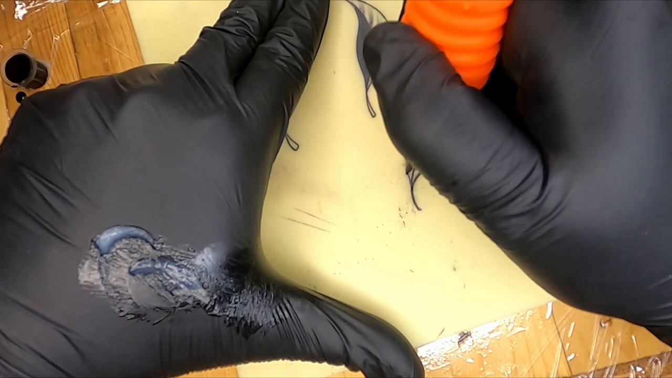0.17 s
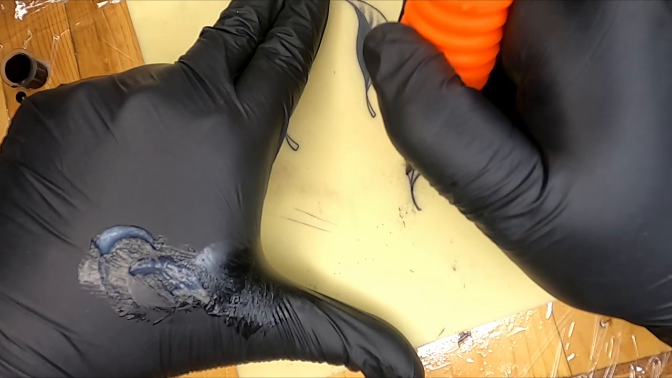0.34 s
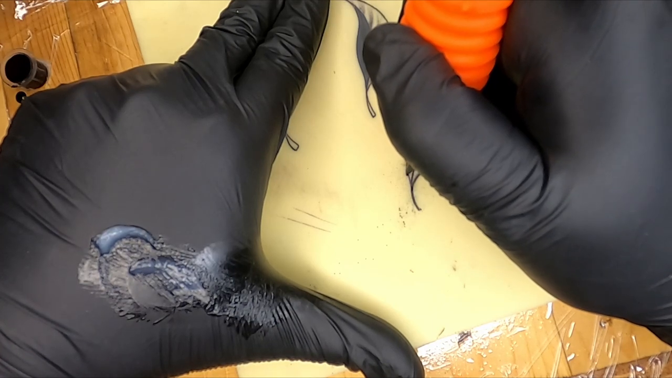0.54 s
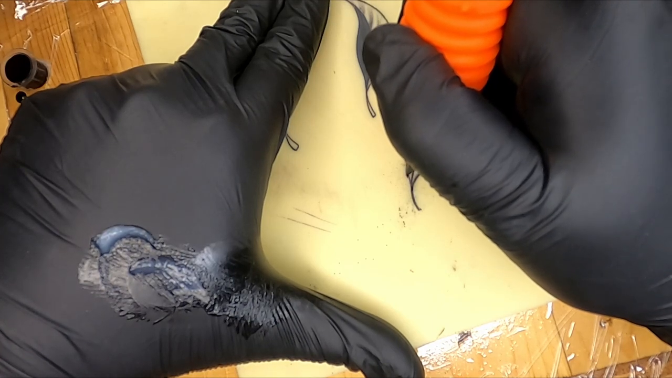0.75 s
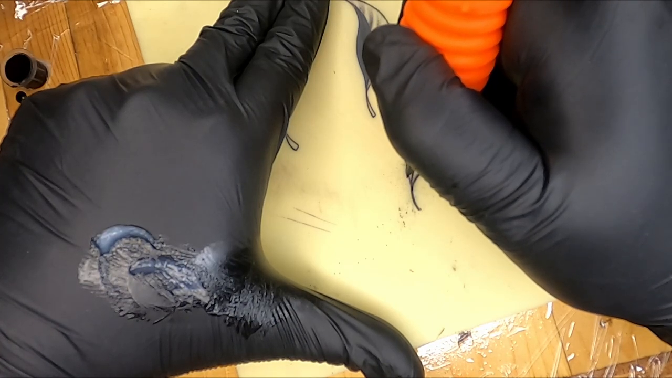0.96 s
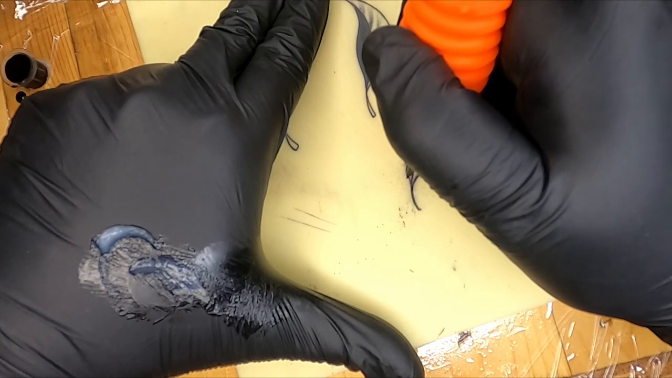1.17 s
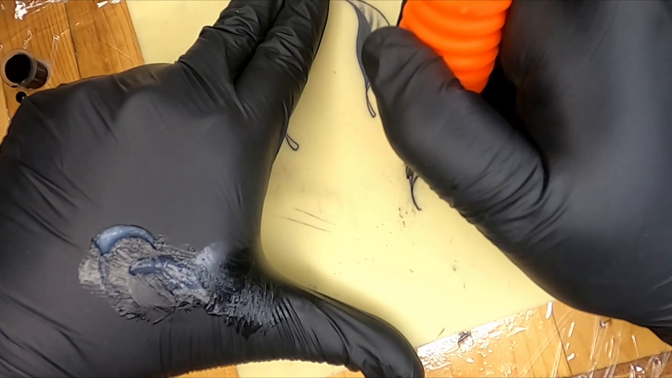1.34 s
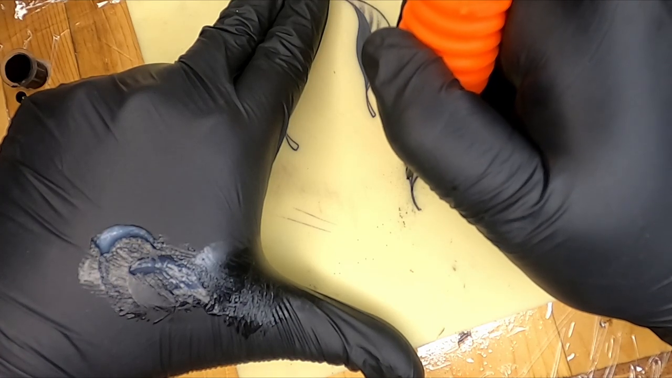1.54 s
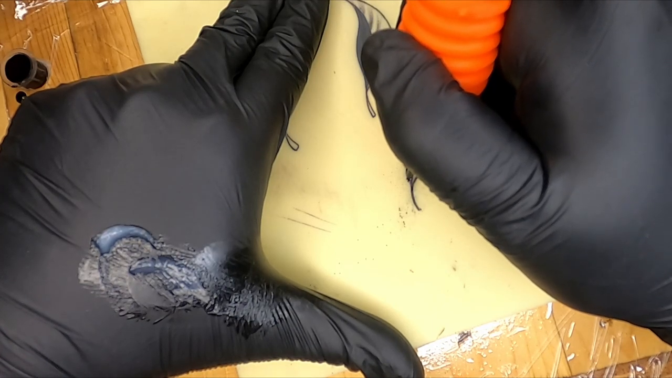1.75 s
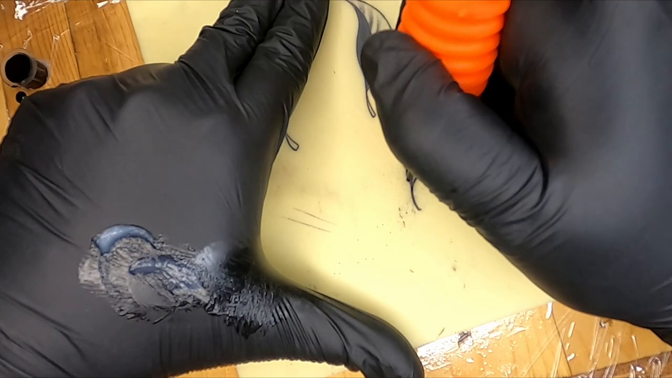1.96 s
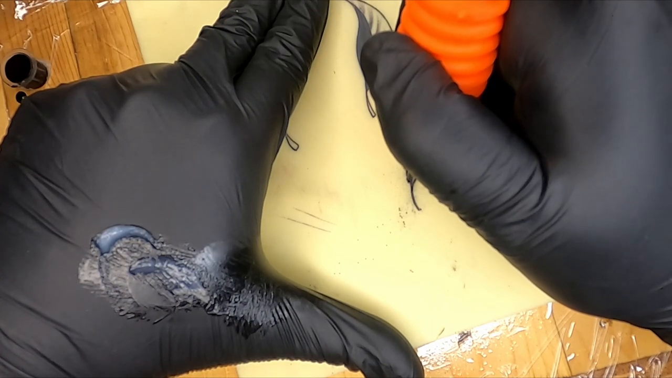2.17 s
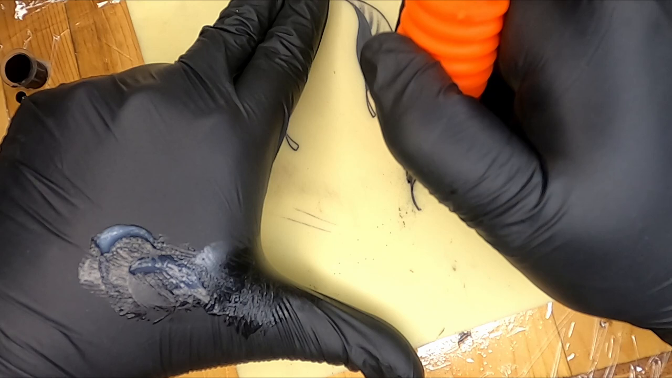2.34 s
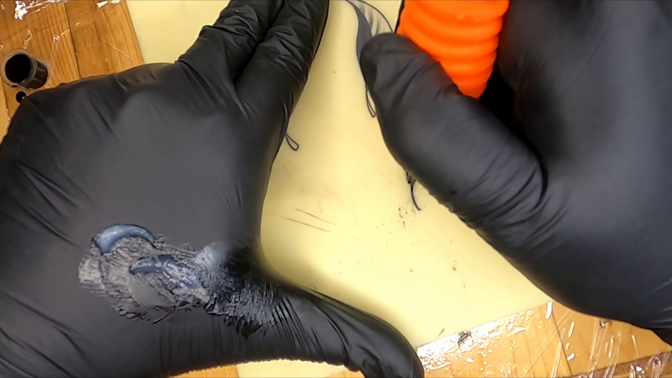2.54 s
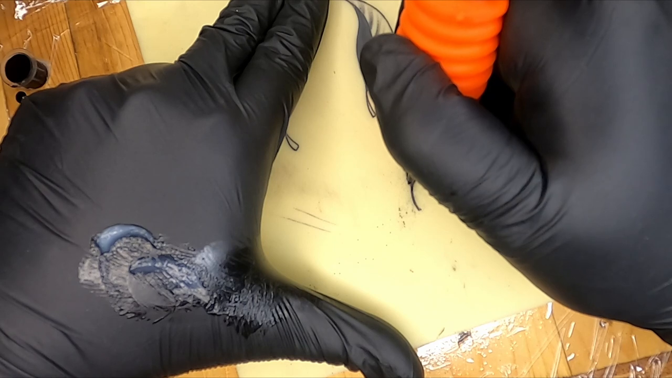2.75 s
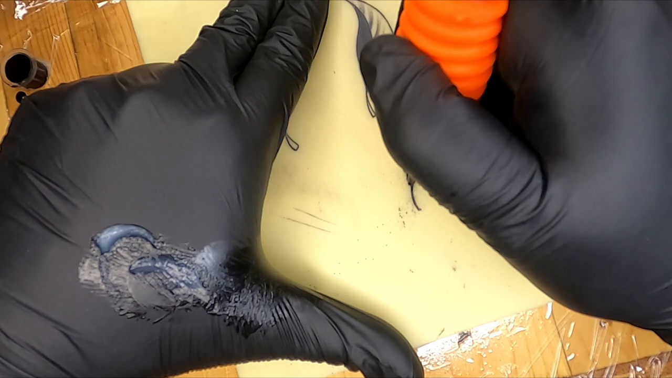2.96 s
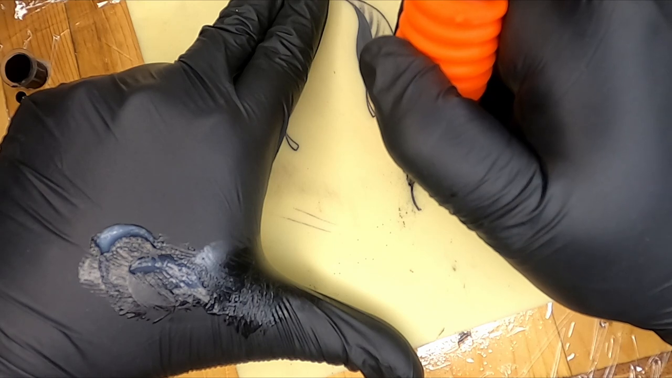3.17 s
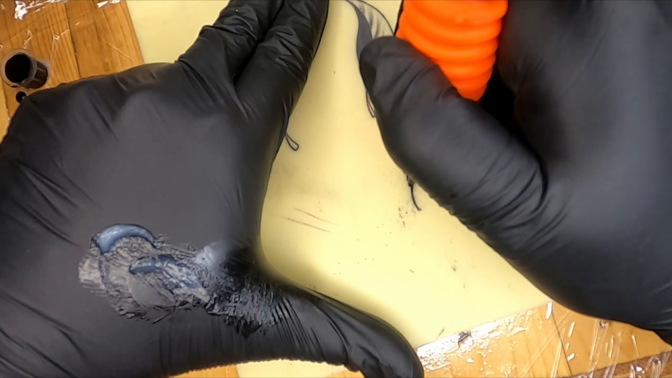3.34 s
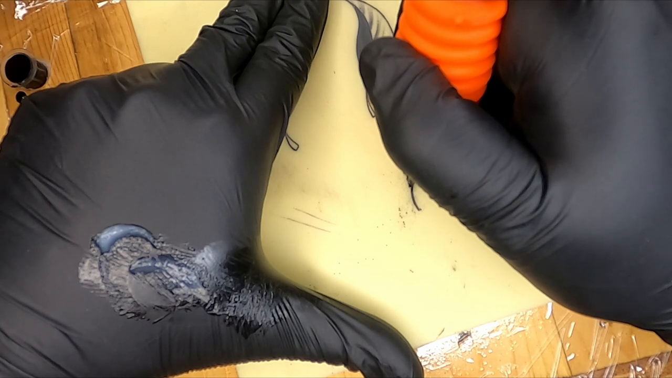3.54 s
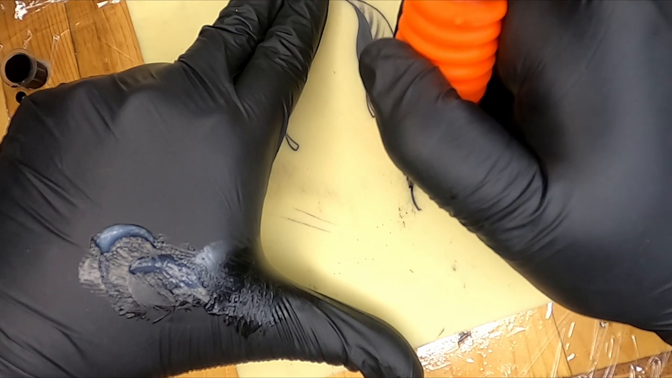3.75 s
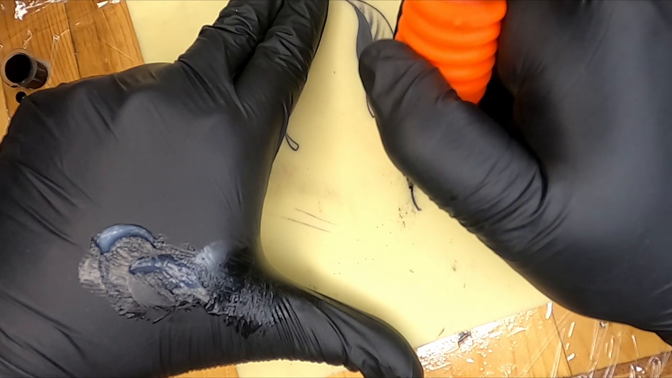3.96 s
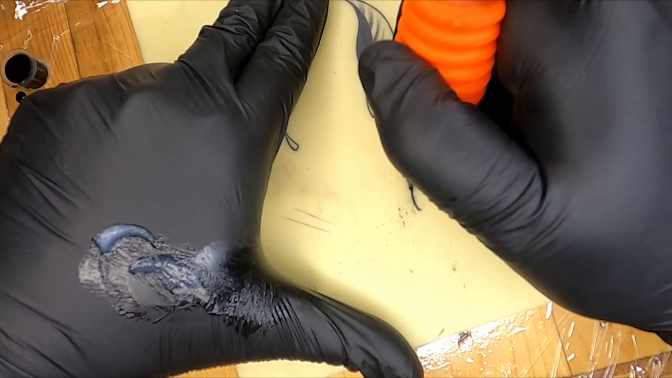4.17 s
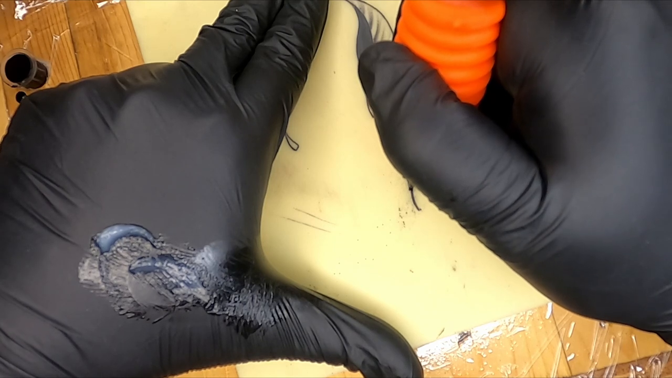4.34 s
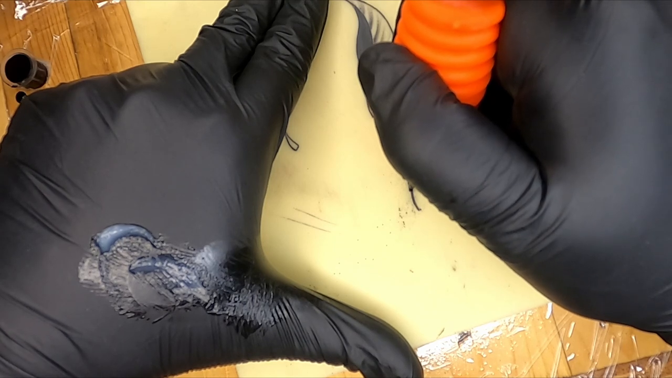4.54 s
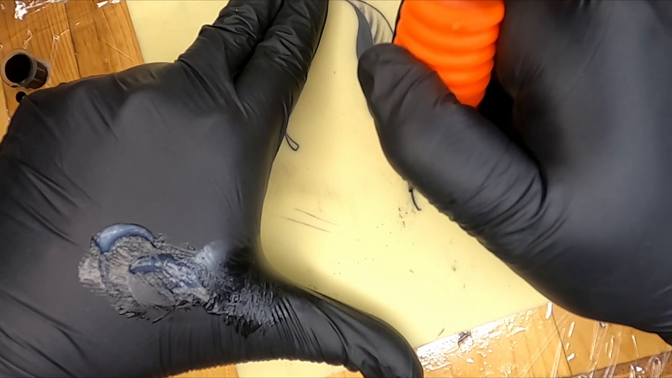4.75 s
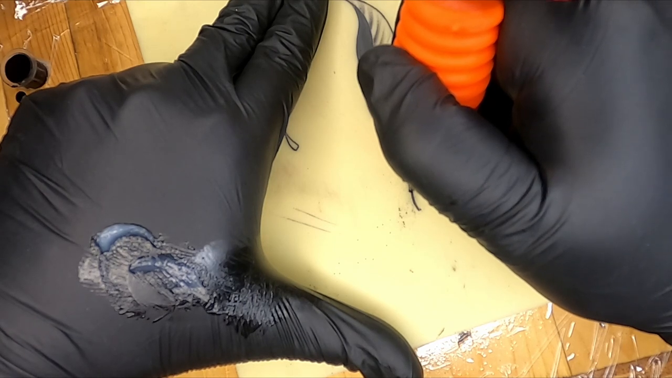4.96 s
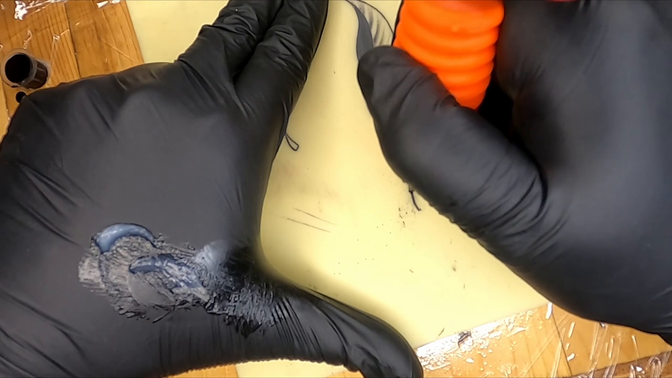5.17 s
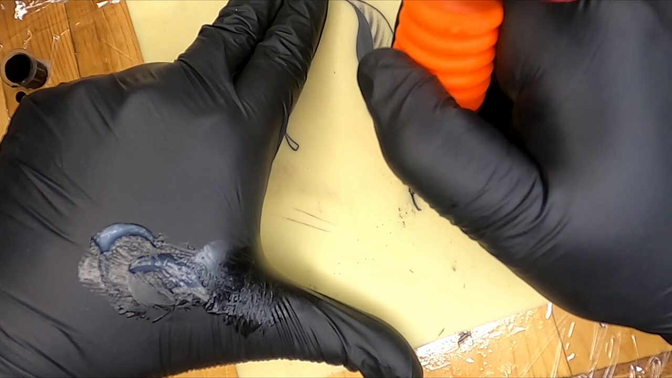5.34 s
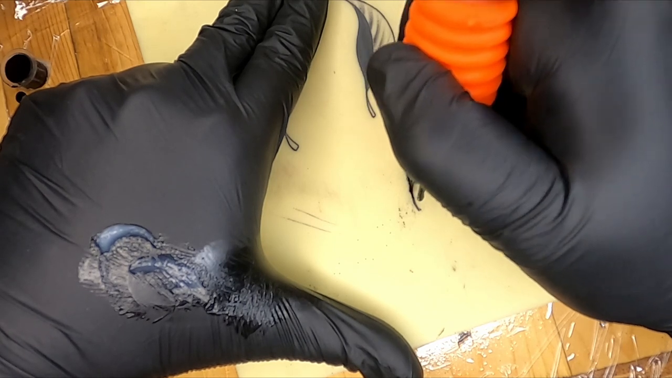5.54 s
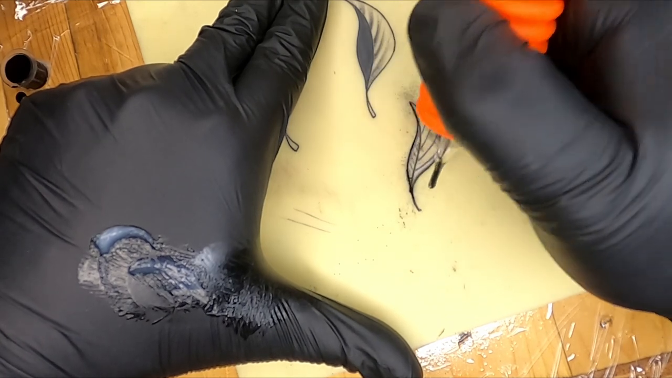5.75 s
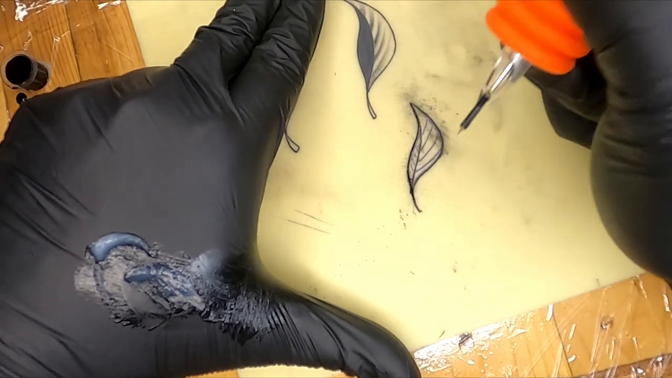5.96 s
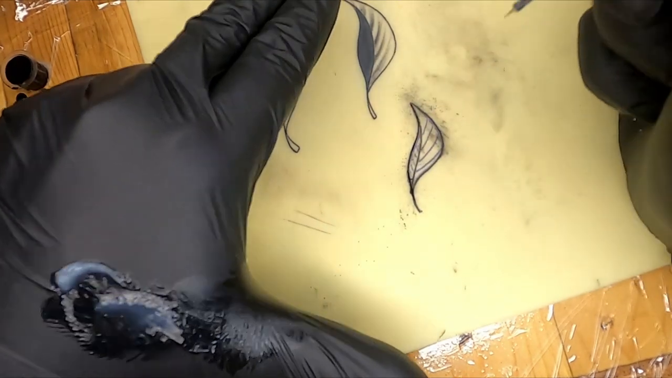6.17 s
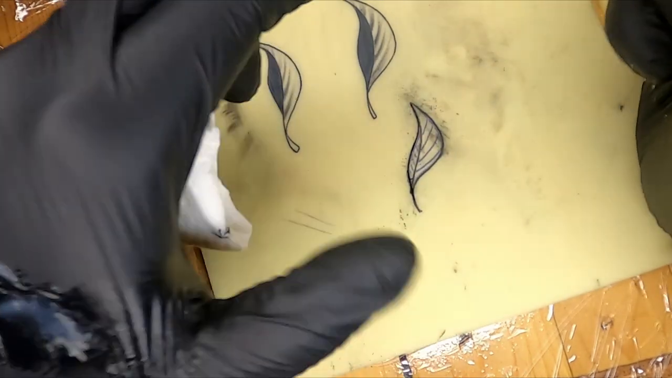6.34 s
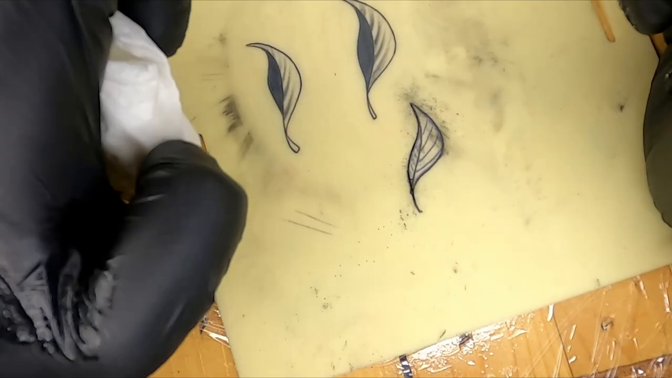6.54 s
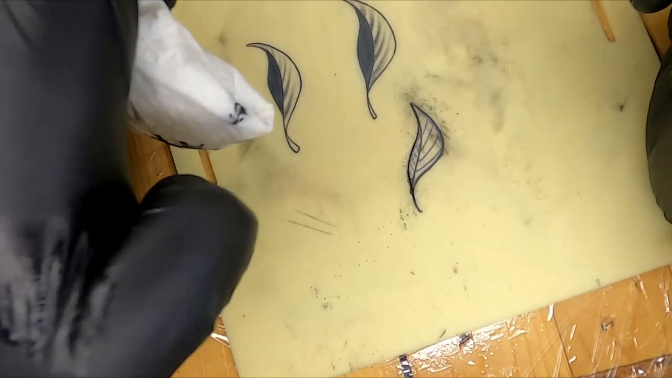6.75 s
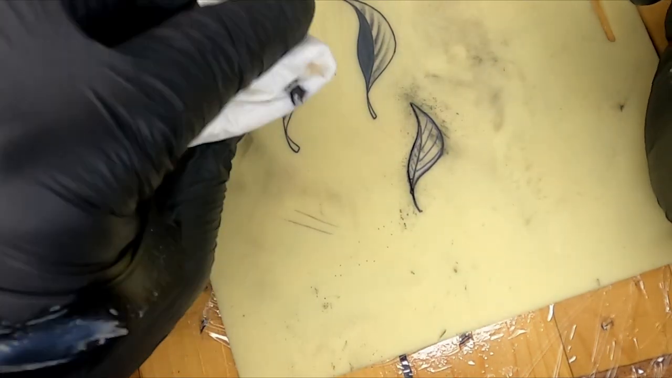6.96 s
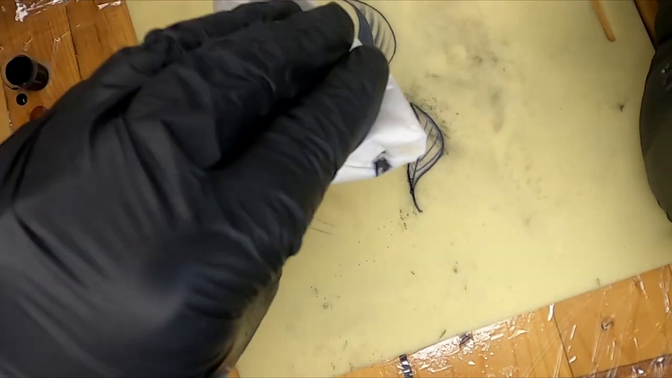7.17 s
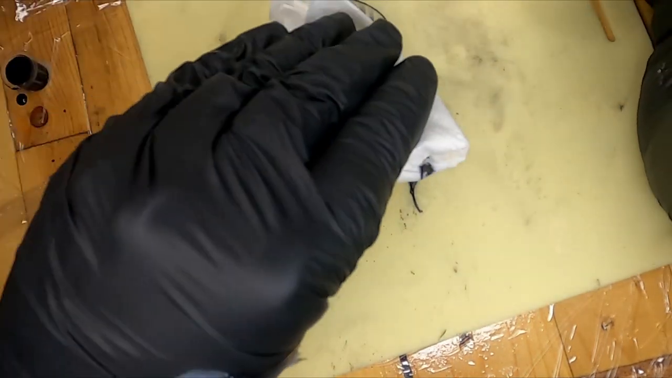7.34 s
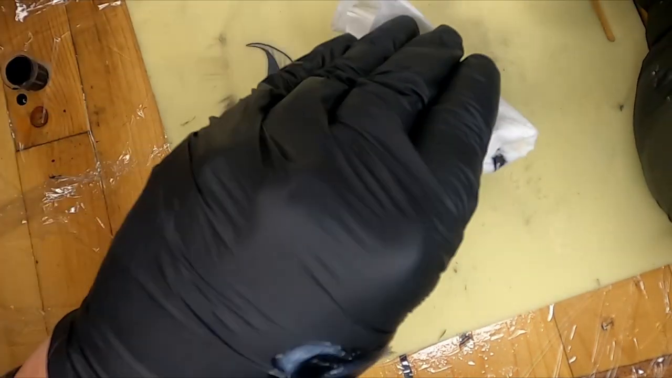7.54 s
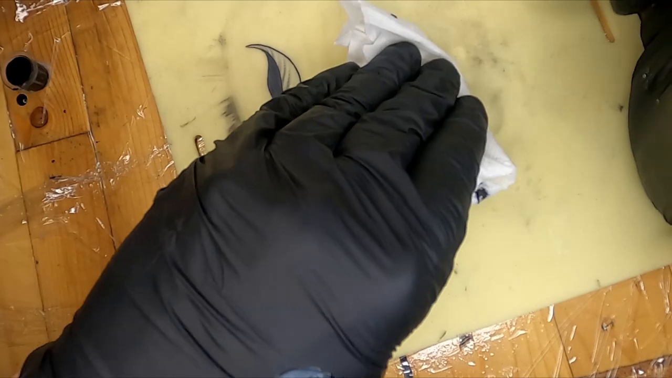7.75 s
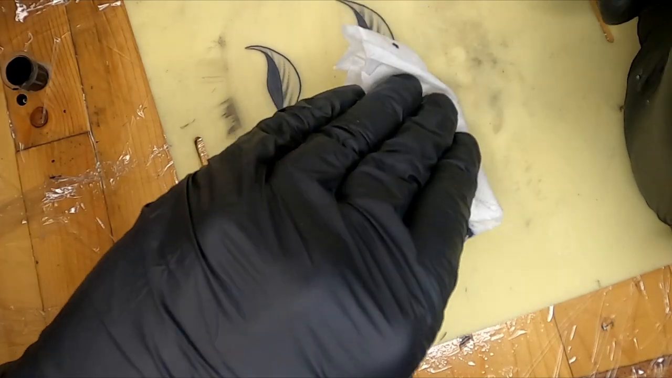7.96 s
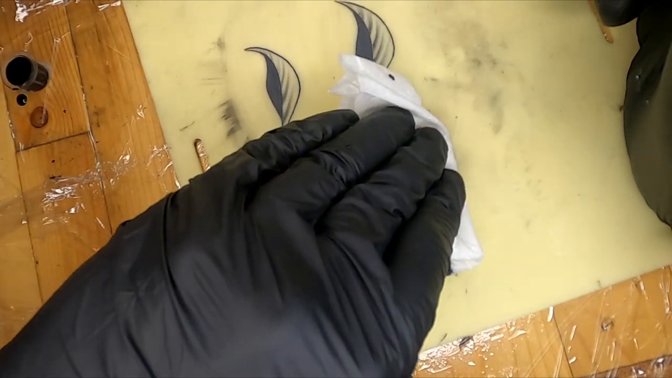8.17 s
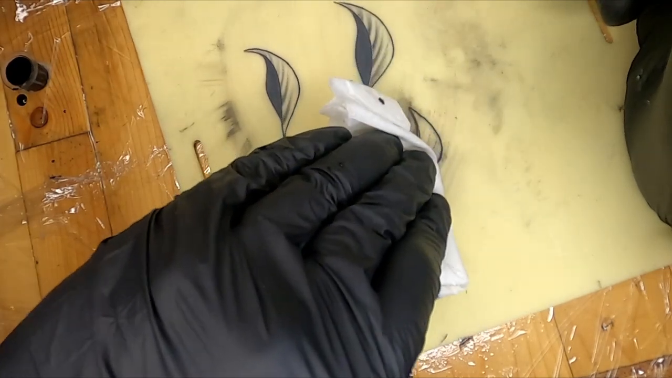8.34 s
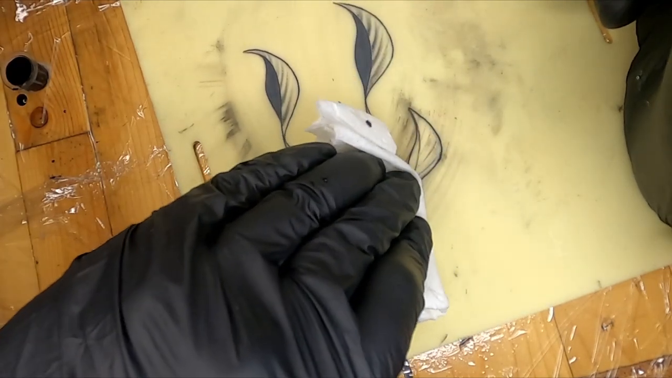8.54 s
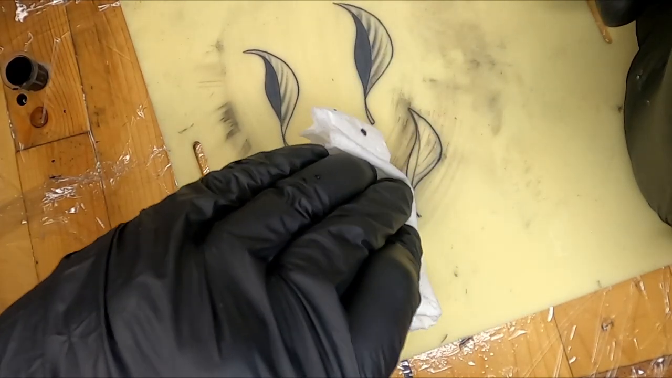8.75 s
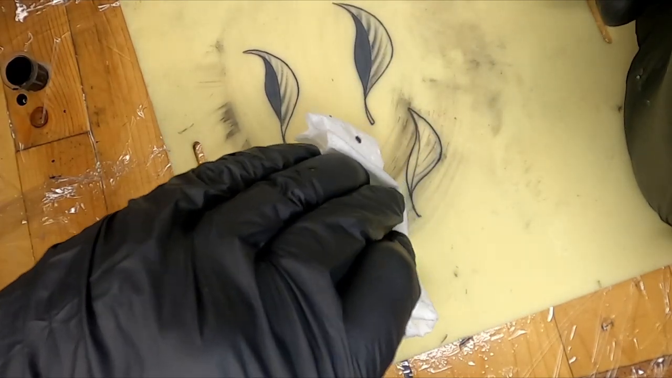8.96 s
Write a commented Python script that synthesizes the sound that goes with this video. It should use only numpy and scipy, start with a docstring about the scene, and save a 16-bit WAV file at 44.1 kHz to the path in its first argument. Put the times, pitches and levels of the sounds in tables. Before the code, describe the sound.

Close to the microphone in a quiet room, a tattoo machine works on rubber practice skin with an even, sizzling, metallic buzz and a light scrape. The buzz roughens briefly when the needle snags. Two thirds of the way through, the machine moves aside and runs on, softer but at the same pitch, while a gloved hand faintly rubs the skin with a paper towel and nudges the wooden table.

```python
"""A rotary tattoo machine buzzes as it draws a line in rubber practice skin, near a phone above a table.
Each turn of its cam (an off-centre wheel) knocks the needle bar and shakes the housing into a hum.
The rubber drags on the needle and now and then catches it. Then the needle lifts, and the machine
swings past the phone and runs on at the side. A gloved hand wipes the skin with a paper towel,
and soft nudges thud through the wooden table."""
import sys
import numpy as np
from scipy import signal
from scipy.fft import rfft, irfft
from scipy.io import wavfile
from scipy.ndimage import uniform_filter1d

SR = 44100
rng = np.random.default_rng(int(sys.argv[2]) if len(sys.argv) > 2 else 0)


def master_out(mix):
    """Clip the mix to full scale and print it as 16-bit PCM to the path in sys.argv[1]."""
    frames = np.transpose(np.atleast_2d(mix))
    ceiling = np.clip(frames, -1, 1)
    pcm = np.round(ceiling * 32767).astype(np.int16)
    wavfile.write(sys.argv[1], SR, pcm)


N = 396900
TIME = np.arange(N) / SR

# The machine is closest to the phone. In order: start, length and fade, all in seconds.
PASSING = (5.885, 0.25, 0.16)
# The wiping hand shields the machine. In order: start, length and fade, all in seconds.
SHIELDED = (6.3, 1.66, 0.37)
EASE_S, EASE_LENGTH_S = 5.47, 0.08  # middle and length of the move to a light touch
SWING_S, SWING_LENGTH_S = 6.06, 0.51  # middle and length of the swing aside


def motor(slowing_hz, snag):
    """Count the turns of the cam so far; the skin drags on it unevenly."""
    # The motor drifts slowly. Each row: time in seconds, turns per second.
    speed = [(0, 105.42), (1.7, 105.3), (2.05, 105.55), (3.9, 105.58), (4.8, 105.85), (5.4, 105.7),
             (5.55, 105.0), (5.95, 105.0), (6.4, 105.55), (8.2, 105.25), (9, 105.35)]
    hz = np.interp(TIME, *np.transpose(speed))
    return np.cumsum((hz - slowing_hz) * (1 + 0.001255 * snag * wander(40))) / SR


def knocks(turns, contact, snag):
    """The bar strikes hard once a turn and rattles loosely after; snags make both less even."""
    # Each row: delay after the strike in ms, level in the skin in dB, level running free in dB,
    # random spread of timing in ms, random spread of level in dB.
    loose_knocks = [(0.446, -13, -13, 0.023, 4), (1.699, -5, -18, 0.041, 1), (4.602, -16, -6, 0.015, -3),
                    (7.196, -9.5, -11, 0.031, 3), (8.102, -26, 6.5, 0.017, 3.5)]
    times = np.interp(np.arange(int(turns[-1]) + 1), turns, TIME)
    pressed, uneven = (np.interp(times, TIME, curve) for curve in (contact, snag))

    def each_turn(lag_ms, db, spread_ms, spread_db):
        """One knock in every turn."""
        late, strong = rng.standard_normal((len(times), 2)).T * uneven
        return clicks(times + (lag_ms + spread_ms * late) / 1000, undb(db + spread_db * strong))

    loose = sum(each_turn(lag_ms, pressed * skin_db + (1 - pressed) * free_db, *spread)
                for lag_ms, skin_db, free_db, *spread in loose_knocks)
    return each_turn(0, 0, spread_ms=0.008, spread_db=-0.56), loose


def needle(strike, loose):
    """Each strike gives a dry tick, and all the knocks make the needle tube ring."""
    # Each row: ringing pitch in Hz, width in Hz, level in dB.
    tube_tones = [(3690, 334, 1.5), (6955, 530, 2), (8046, 560, -2.5), (9990, 620, -2), (12530, 540, -5)]
    rattle = undb(-0.5) * smear(strike, crack_ms=0.84, tail_ms=3.56, tail_db=-7) + loose
    tick = bending_waves(strike) + undb(-23) * smear(strike, crack_ms=0.51, tail_ms=3.6, tail_db=-5)
    return tick + sum(undb(db) * resonance(rattle, hz, width) for hz, width, db in tube_tones)


def bending_waves(strike, size=256):
    """Bending waves stretch a strike into a tiny chirp: each pitch arrives at its own time."""
    # Each row: frequency in Hz, arrival time in ms.
    arrivals = [(3000, 0.5355), (4500, 0.38), (6000, 0.13), (8000, 0.44), (10200, 0.99), (12000, 0.56),
                (16000, 0.25)]
    lag_ms = np.interp(np.fft.rfftfreq(size, 1 / SR), *np.transpose(arrivals))
    phase = 2 * np.pi * np.cumsum(lag_ms / 1000) * SR / size
    return signal.oaconvolve(strike, irfft(np.exp(-1j * phase))[:size // 2])[:N]


def reflections(buzz, away):
    """The buzz is crisp under the phone, and blurred by bounces off hands and table when aside."""
    # The tone colour in those two places. Each row: frequency in Hz, gain in dB.
    near_colour = [(2400, -39), (3200, -33), (3600, -5), (4030, -8.5), (4370, 1.5), (5400, 1.5), (6400, -5),
                   (8000, 0), (8730, -10.5), (9700, 2), (11100, -13), (12400, -7), (13300, -15),
                   (14400, -6), (16000, -12)]
    aside_colour = [(2000, -38.5), (3100, -16), (3600, -11), (4150, -6), (5760, -4.5), (6650, -11),
                    (7150, -7.5), (7800, -0.5), (9130, -3), (9850, -2), (10800, -11), (13600, -8),
                    (16000, -14)]
    # The bounces change as fast as the hands move, which is fastest around the swing.
    changes_per_s = 0.8004 + 15 * ramp(EASE_S, EASE_LENGTH_S) * np.exp(-abs(TIME - SWING_S) / 0.898)
    changes = np.cumsum(changes_per_s) / SR
    bounced = sum(wander(1, changes) * smear(buzz, crack_ms=0.16, tail_ms=6, tail_db=-11)
                  for _ in range(3))
    near = unit(colour(buzz, near_colour))
    far = unit(colour(buzz + undb(-7) * bounced, aside_colour))
    far_share = np.clip(0.16 + 0.76 * away + 0.1 * spell(*PASSING), 0, 1)
    return (1 - far_share) * near + far_share * far


def table_echo(buzz):
    """A quick echo off the table weakens some pitches; these dips slide down as the machine rises."""
    # The echo is dull near 8 and 16 kHz but keeps a bright band near 11 kHz.
    # Each row: frequency in Hz, gain in dB.
    echo_colour = [(4000, -6), (8000, -15), (11000, 1.5), (16000, -16.5)]
    # The echo is strongest during the swing. In order: start, length and fade, all in seconds.
    strong_echo = (5.9, 0.643, 0.16)
    lag_ms = 0.2205 + 0.213 * ramp(centre_s=6.15, length_s=0.63)
    strength = 0.16 + 0.51 * spell(*strong_echo)
    return buzz + strength * np.interp(TIME - lag_ms / 1000, TIME, colour(buzz, echo_colour))


def buzz_balance(buzz, snag, rattle_db):
    """The machine's place sets how loud each band of the buzz is; snags make the rattle flare."""
    # Four bands, low to high: grip ring, needle knock, bright rattle, sizzle. Each row: level in
    # the skin, level aside, change when passing, change when shielded and slow wander, all in dB,
    # then the middle and length of its turn away from the phone in seconds.
    bands = [(-38.5, -37, 7, -0.5, 1, 5.9, .4), (-29.5, -41, -0.5, .3, 0.04, 6.14, 0.59),
             (-23.5, -29, 0, -2.5, -0.04, 6, 0.31), (-32.5, -39, 0, -2.2, .2, 5.88, 0.72)]
    # The borders between the bands, in Hz.
    edges_hz = [4200, 6500, 10800]
    # The grip rings more freely at times. Each row: start and length in seconds, boost in dB.
    grip_rings = [(1.152, .3, 2), (1.7, .4, 2), (3.5, 0.345, 3.5), (4.9, 0.53, 2)]
    passing, shielded = spell(*PASSING), spell(*SHIELDED)
    barrel_tone = undb(9) * passing * resonance(buzz, hz=4090, width_hz=550)
    grip_db, knock_db, bright_db, sizzle_db = (
        skin_db + (aside_db - skin_db) * ramp(*turn_away)
        + passing * pass_db + shielded * shield_db + wander_db * wander(5)
        for skin_db, aside_db, pass_db, shield_db, wander_db, *turn_away in bands)
    ring_db = sum(db * spell(start, length, fade_s=0.057) for start, length, db in grip_rings)
    flare_db = rattle_db + 0.62 * snag ** 2 * wander(35)
    out, rest = 0, buzz + barrel_tone
    for edge_hz, db in zip(edges_hz, (grip_db + ring_db, knock_db, bright_db + flare_db)):
        band = signal.sosfiltfilt(signal.butter(8, edge_hz, fs=SR, output="sos"), rest)
        rest = rest - band
        out = out + steady(band) * undb(db)
    return out + steady(rest) * undb(sizzle_db)


def housing_hum(turns, contact, snag, away, slowing_hz):
    """The housing hums at multiples of the motor speed; the unbalanced cam adds the lowest note."""
    # In the skin, then running free. Each row: multiple of the speed, relative level in dB.
    pressed_tones = [(2, -9.5), (3, -5.5), (4, -11.5), (5, -13.5), (6, -20), (7, -11.5), (8, -17.5),
                     (9, -1.5), (10, -22), (11, -11.5), (12, -1), (13, 0.5), (14, -5.5), (15, -3),
                     (16, -4.5), (17, -20), (18, -16), (19, -11.5), (20, -22), (21, -9), (22, -6.5),
                     (23, -12), (24, -8), (25, -17.5), (26, -23), (27, -9.5), (28, -11), (29, -14.5),
                     (30, -11), (31, -11)]
    free_tones = [(2, -13.5), (3, -31), (4, -16), (5, -19), (6, -14.5), (7, -11), (8, -14.5), (9, -2.5),
                  (10, -7), (11, 1), (12, 4), (13, -10), (14, -2.5), (15, -8), (16, -3), (17, -8.5),
                  (18, -15), (19, -14), (20, -3), (21, -5.5), (22, -4), (23, -7), (24, 1.5), (25, -2.5),
                  (26, 3), (27, -58), (28, -1), (29, 0), (30, -21), (31, -3.5)]
    # The cam's shaking. Each row: time in seconds, level in dB.
    shake = [(0.0, -60), (0.07, -61.5), (5.39, -61), (5.52, -60), (5.59, -68), (5.84, -62), (5.94, -50),
             (6.17, -50), (6.52, -61), (8.92, -51.5), (9.0, -53)]
    clock, pressed, uneven = TIME[::200], contact[::200], snag[::200]
    angle = (2 * np.pi * (turns % 1)).astype(np.float32)
    hum = 0
    for (multiple, pressed_db), (_, free_db) in zip(pressed_tones, free_tones):
        flutter_db = 2.5 * uneven * wander(18, clock)
        drift_db = 1.12 * wander(2.555, clock)
        db = pressed * pressed_db + (1 - pressed) * free_db + flutter_db + drift_db
        phase = 1.14 * rng.standard_normal()  # loosely in step, so the hum throbs with each stroke
        hum = hum + np.interp(TIME, clock, undb(db)) * np.sin(multiple * angle + phase)
    place_db = -40.5 - 2 * away + 1.8 * spell(*PASSING) - 1.3 * spell(*SHIELDED)
    hum = steady(hum) * undb(place_db + slowing_hz)  # swells 1 dB for each Hz of speed lost
    shake_db = np.interp(TIME, *np.transpose(shake))
    return hum + unit(np.sin(angle)) * undb(shake_db)


def rubber_grip(contact):
    """The rubber grips in patches and sometimes catches the needle, slowing it and adding rattle."""
    # Each row: start and length in seconds, speed lost in Hz, added snag from 0 to 1, rattle in dB.
    catches = [(1.802, 0.16, 0.81, 0.26, 1.5), (1.96, .3, 0.015, 0.24, -0.5), (2.302, 0.16, 0.86, 0.8, 0.5),
               (2.661, 0.1, 0.97, 0.7, 1.2), (3.322, 0.15, 0.24, 0.43, 0), (4.968, .12, 0.24, 0.55, 0.5),
               (5.10, 0.065, 1.3, 0.6, 1.5), (5.43, 0.067, .1, 0.5, 1.5)]
    slowing_hz, caught, rattle_db = sum(np.outer(effects, spell(start, length, fade_s=0.098))
                                        for start, length, *effects in catches)
    in_skin = 1 - ramp(EASE_S, EASE_LENGTH_S)
    patches = 0.737 * undb(1.8 * wander(14))
    snag = in_skin * patches + (1 - in_skin) * 0.33 + contact * caught
    return slowing_hz, np.clip(snag, 0, 1.4), rattle_db


def scrape(turns, contact, snag):
    """The needle rubs on the rubber, loudest just after each stroke."""
    # Each row: frequency in Hz, relative level in dB.
    scrape_colour = [(100, -39), (300, -3.5), (650, -21), (950, -2), (1400, 1), (1900, -4), (3000, -1),
                     (4500, 7.5), (9000, -3), (15000, -21)]
    pulses = 0.45 + np.exp(-(turns % 1) / 0.044)
    return unit(noise(scrape_colour) * pulses) * undb(-48.5 + 4.4 * contact + 4.5 * snag)


def towel_wipes():
    """Glove and paper towel rub over the skin in uneven drags."""
    # Each row: start in seconds, length in seconds, level in dB.
    drags = [(5.823, 0.44, -52.5), (6.42, 0.38, -56.5), (7.32, 0.41, -57), (7.75, 0.34, -66),
             (8.419, 0.52, -61.5)]
    # Each row: frequency in Hz, relative level in dB.
    wipe_colour = [(60, -1), (170, 0.5), (280, -7), (430, 9), (600, -6), (900, 1), (2500, 2), (9000, -86)]
    rubbing = sum(undb(db) * spell(start, length, fade_s=0.12) for start, length, db in drags)
    return noise(wipe_colour) * rubbing * undb(2 * wander(22))


def table_thuds(hz=36, decay_s=0.034):
    """Hands nudge the table, which gives a low thud that quickly dies away."""
    # Each row: start in seconds, relative level in dB.
    nudges = [(6.069, -63.5), (6.569, -57), (6.929, -54), (7.172, -59), (7.719, -56)]
    out = 0
    for start, db in nudges:
        age = np.maximum(TIME - start, 0)
        out = out + undb(db + 10) * np.sin(2 * np.pi * hz * age) * np.exp(-age / decay_s)
    return out


def room_noise():
    """The room's steady rumble and hiss."""
    # Each row: frequency in Hz, relative level in dB.
    room_colour = [(20, 4), (40, -12.5), (80, -8), (150, -12), (300, -20), (1000, -20), (4000, -42),
                   (15000, -23)]
    return noise(room_colour)


def undb(db):
    """Turn decibels into a gain."""
    return np.exp(np.asarray(db) * (np.log(10) / 20))


def unit(x):
    """Scale to an average (rms) level of 1."""
    return x / np.sqrt(np.mean(x ** 2))


def steady(x, size=3348):
    """Hold the running (rms) level at 1."""
    return x / np.sqrt(uniform_filter1d(x ** 2, size) + 1e-12)


def ramp(centre_s, length_s):
    """A smooth move from 0 to 1."""
    progress = np.clip((TIME - centre_s) / length_s + 0.5, 0, 1)
    return (1 - np.cos(np.pi * progress)) / 2


def spell(start_s, length_s, fade_s):
    """Fade in, hold, fade out."""
    return ramp(start_s, fade_s) - ramp(start_s + length_s, fade_s)


def wander(rate, clock=TIME):
    """A random curve with a spread near 1 that heads for a new value rate times per clock unit."""
    values = rng.standard_normal(1024)
    return 1.2 * np.interp(clock * rate, np.arange(len(values)), values)


def colour(x, points):
    """Shape the tone along (Hz, dB) points, with a filter that rings only after each sound."""
    hz, db = np.transpose(points)
    size = 4096
    freqs = np.maximum(np.fft.rfftfreq(size, 1 / SR), 1)
    gain = undb(np.interp(np.log(freqs), np.log(hz), db))
    cepstrum = irfft(np.log(gain))
    cepstrum[1:size // 2] *= 2  # move the ringing from before the sound to after it
    cepstrum[size // 2 + 1:] = 0
    return signal.oaconvolve(x, irfft(np.exp(rfft(cepstrum))))[:N]


def noise(points):
    """Noise at level 1, shaped along (Hz, dB) points."""
    return unit(colour(rng.standard_normal(N), points))


def resonance(x, hz, width_hz):
    """Keep a narrow band around one pitch."""
    return signal.lfilter(*signal.iirpeak(hz, hz / width_hz, fs=SR), x)


def clicks(times, sizes, reach=8):
    """Clicks at exact times, even between two samples."""
    at = times[:, None] * SR
    index = np.floor(at).astype(int) + np.arange(1 - reach, reach + 1)
    taps = sizes[:, None] * np.sinc(index - at) * np.cos(np.pi * (index - at) / (2 * reach)) ** 2
    inside = (index >= 0) & (index < N)
    return np.bincount(index[inside], taps[inside], N)


def smear(x, crack_ms, tail_ms, tail_db, size=2048):
    """Spread each click into a short crack and a ringing tail, keeping its broad tone colour."""
    ms = np.arange(size) * 1000 / SR
    envelope = np.exp(-(ms / crack_ms) ** 2) + undb(tail_db) * np.exp(-ms / tail_ms)
    response = rfft(rng.standard_normal(size) * envelope)
    response /= np.sqrt(uniform_filter1d(abs(response) ** 2, 15))
    return signal.oaconvolve(x, irfft(response))[:N]


def scene():
    """Machine and hands lie straight ahead; left and right differ only faintly."""
    away = ramp(SWING_S, SWING_LENGTH_S)
    contact = (1 - 0.53 * ramp(EASE_S, EASE_LENGTH_S)) * (1 - away)  # 1 pressed in, 0 lifted
    slowing_hz, snag, rattle_db = rubber_grip(contact)
    turns = motor(slowing_hz, snag)
    buzz = needle(*knocks(turns, contact, snag))
    buzz = table_echo(reflections(buzz, away))
    buzz = buzz_balance(buzz, snag, rattle_db)
    machine = buzz + housing_hum(turns, contact, snag, away, slowing_hz) + scrape(turns, contact, snag)
    mid = machine + towel_wipes() + table_thuds() + undb(-59) * room_noise()
    side = undb(-50) * smear(machine, crack_ms=2.9, tail_ms=3, tail_db=-37) + undb(-71) * room_noise()
    return np.array([mid + side, mid - side])


def record(dry, top_hz=15850):
    """The phone cuts off the highest treble."""
    return signal.sosfilt(signal.ellip(12, 0.1, 90, top_hz, fs=SR, output="sos"), dry)


dry = scene()
out = record(dry)
master_out(out)
```